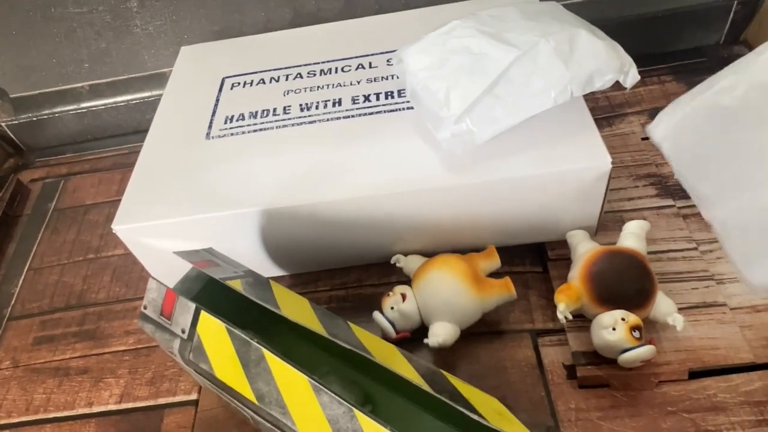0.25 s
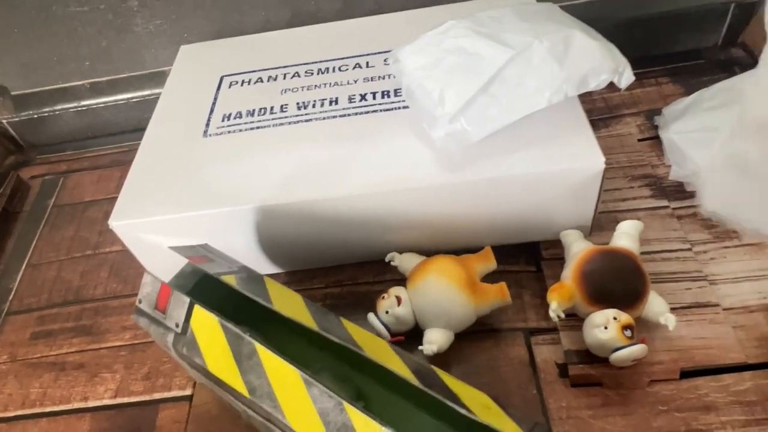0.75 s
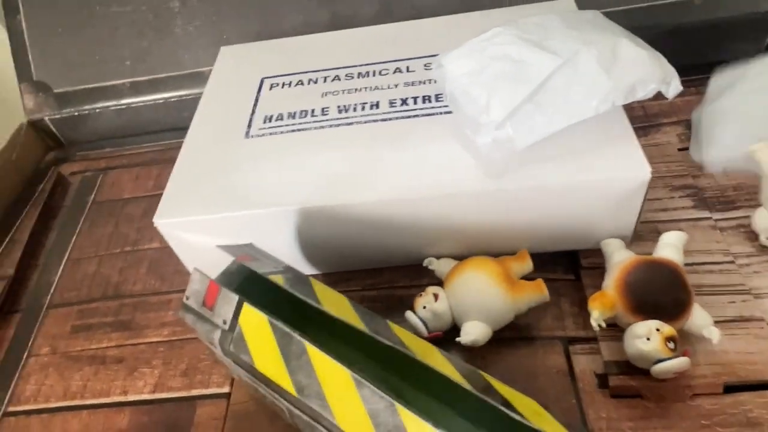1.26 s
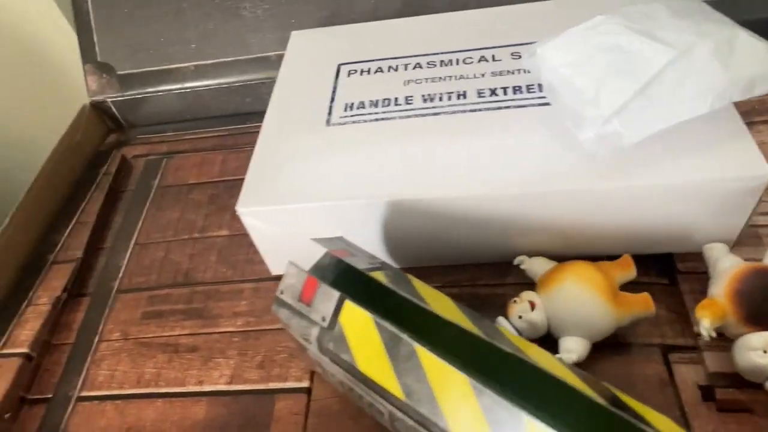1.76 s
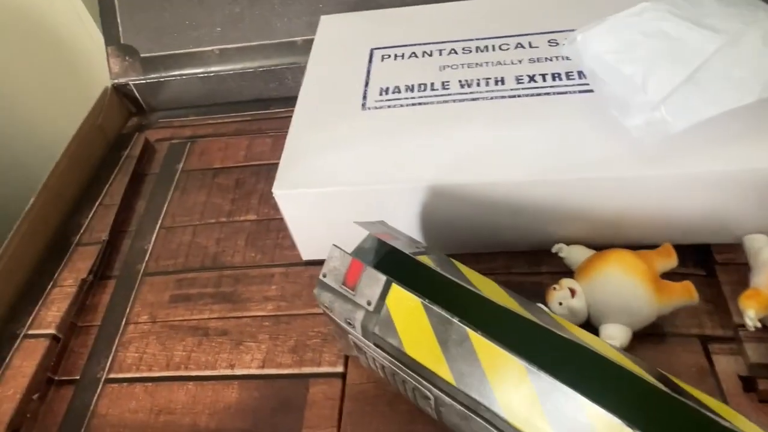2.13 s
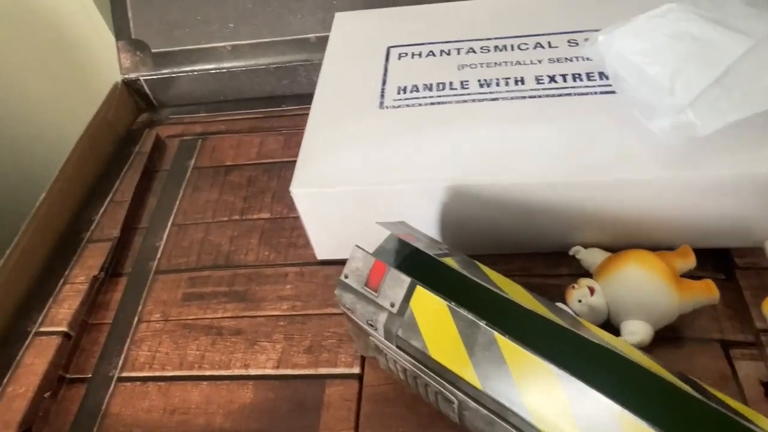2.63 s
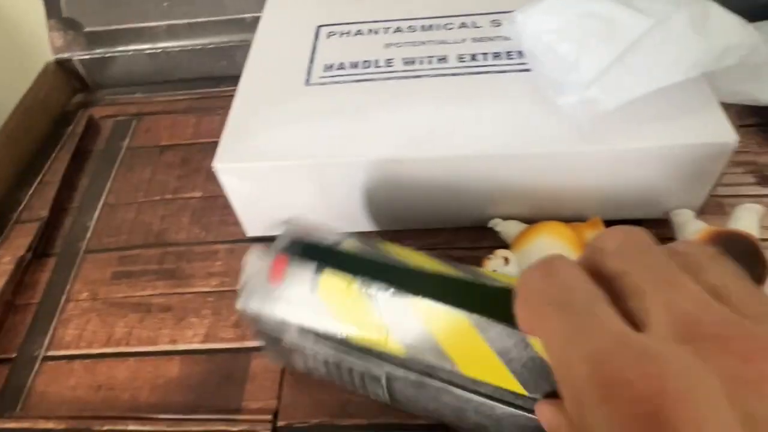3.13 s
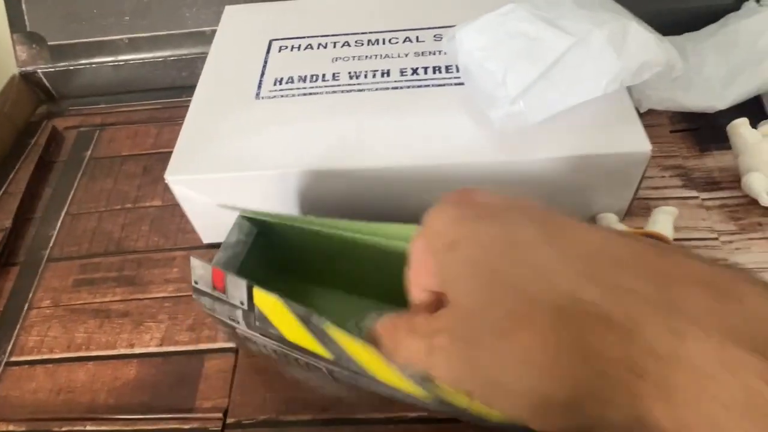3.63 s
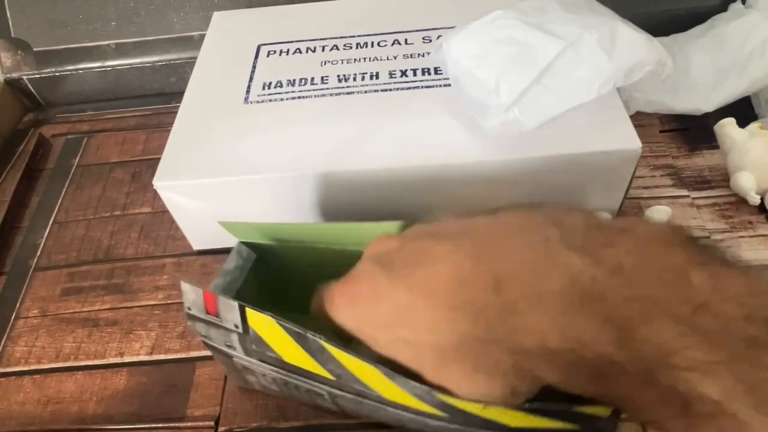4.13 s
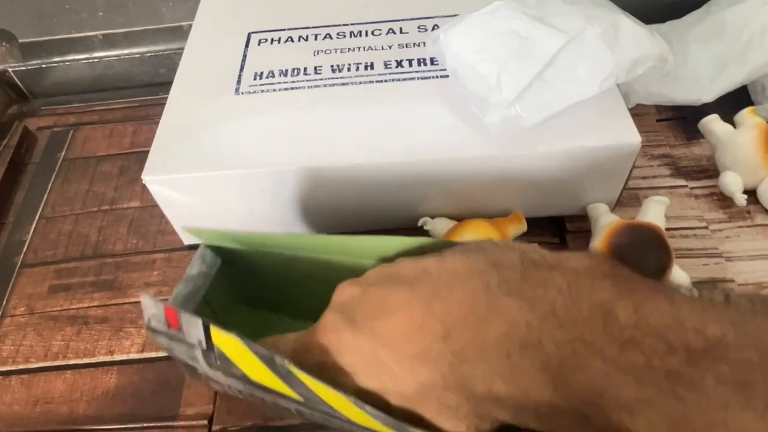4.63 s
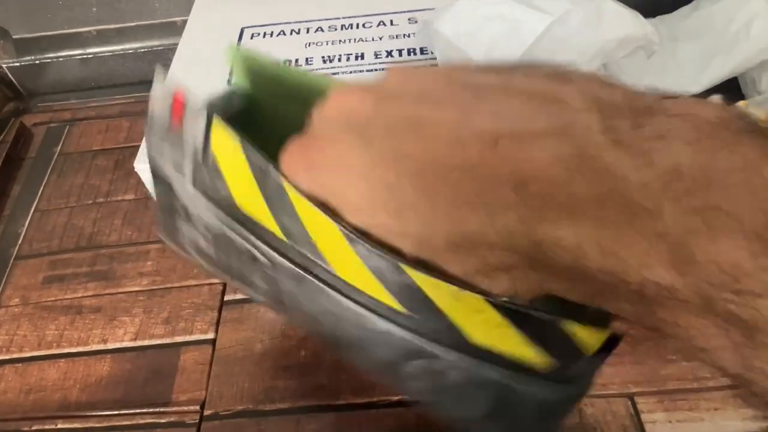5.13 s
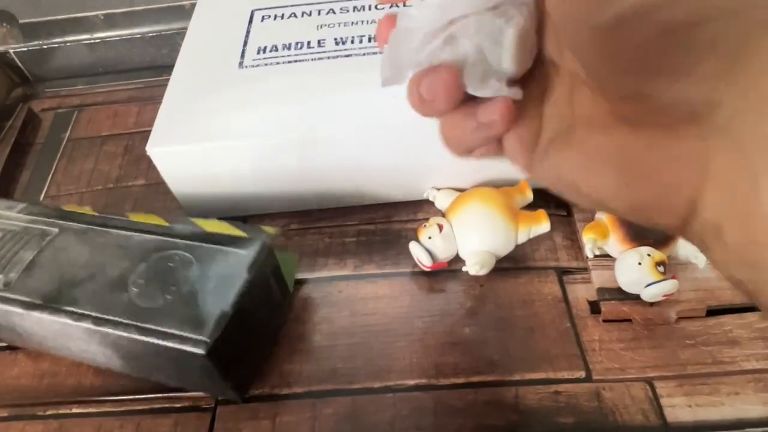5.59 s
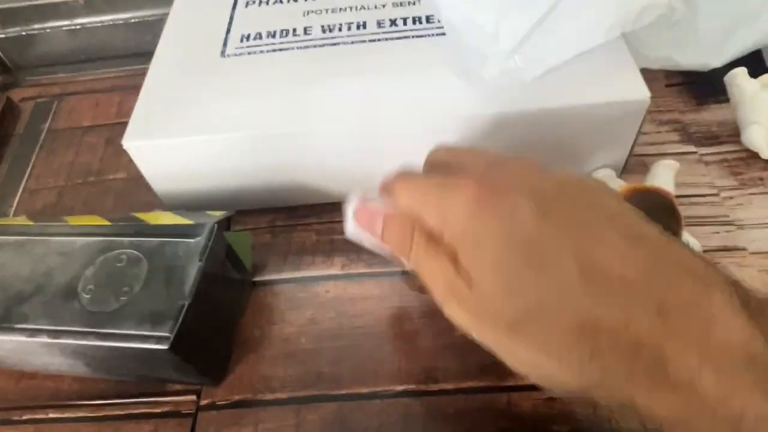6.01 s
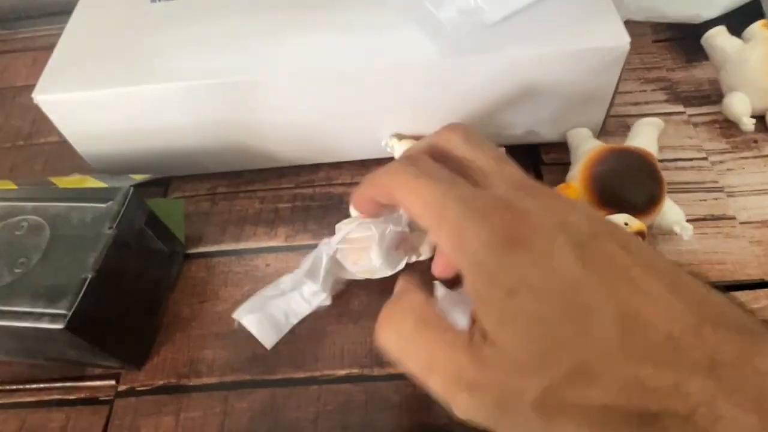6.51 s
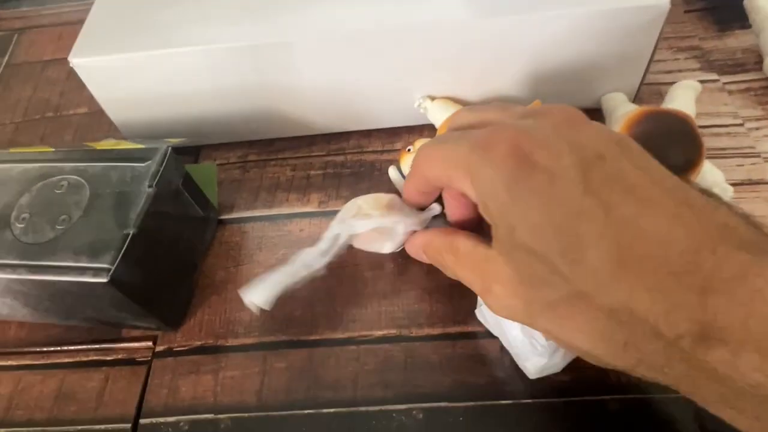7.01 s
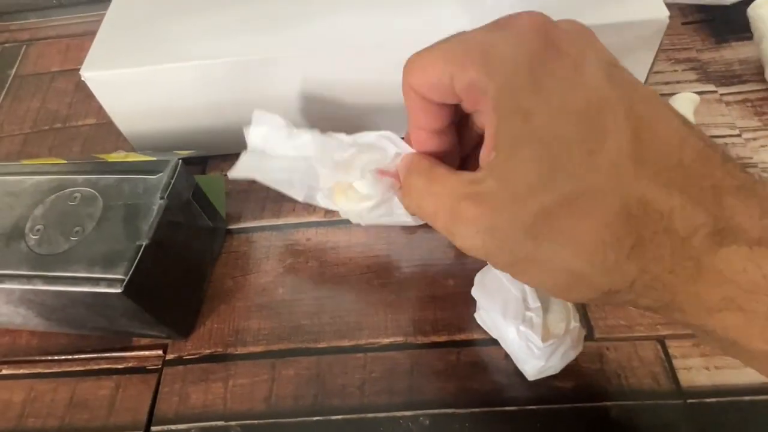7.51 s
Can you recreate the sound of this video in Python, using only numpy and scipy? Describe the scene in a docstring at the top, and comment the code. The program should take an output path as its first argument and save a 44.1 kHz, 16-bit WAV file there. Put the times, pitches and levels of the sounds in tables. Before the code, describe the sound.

A hand handles thin crackly paper right by the microphone, drops a little plastic figure with a firm knock, pauses, then rummages in a light card box with dull thuds, scrapes and boxy crinkling. The box thumps down, small clacks follow, and paper is picked open with fine snaps that grow bright at the end. Small room, short reverberation, soft hiss, hum and low camera handling rumble.

```python
"""Tissue paper crackles and snaps close by as a hand unwraps small plastic figures in a small room.
Swarms of damped sines over shaped hiss make the buckling paper; clicks with short rings make its snaps.
Figures drop on a card-covered table and fingers bump a thin carton: decaying modes with a thud and a rattle.
Fingers rub the carton (noise through its resonances), and the hand-held camera adds a slow handling rumble
over a quiet hiss and hum. Decaying noise gives the room's reverberation."""
import sys
import numpy as np
from scipy import signal
from scipy.fft import rfft, irfft, next_fast_len
from scipy.io import wavfile
from scipy.ndimage import uniform_filter1d, map_coordinates

SR = 44100
rng = np.random.default_rng(int(sys.argv[2]) if len(sys.argv) > 2 else 0)


def transcribe(u):
    """Save the signal u as a 16-bit wav file named by the first command-line argument.

    u: samples, shape (n,) or (channels, n), limited to [-1, 1]; the rate is SR.
    q: integer samples, one column per channel.
    """
    v = np.clip(np.atleast_2d(u).T, -1, 1)
    q = np.round(v * 32767).astype(np.int16)
    wavfile.write(sys.argv[1], SR, q)


N = 341775

# resonances of the thin cardboard carton: (frequency [Hz], level [dB], t60 for a blow of 0.2 s life [s])
CARTON_MODES = [(251.2, -2.5, 0.097), (312.3, 0, 0.075), (470, -5.5, 0.12), (622, -0.5, 0.11),
                (712, 7.5, 0.048), (799, -7.5, 0.19), (1094, 1.5, 0.043), (1410, -8, 0.06)]


def amp(db):
    """Amplitude ratio of a level in dB."""
    return 10 ** (np.asarray(db) / 20)


def unit(x):
    """Normalises to unit rms, so that a later gain sets the level."""
    return x / np.sqrt(np.mean(x ** 2) + 1e-20)


def along(points, hz):
    """Interpolates (frequency [Hz], value) points on a logarithmic frequency axis."""
    f, v = np.transpose(points)
    return np.interp(np.log(hz + 1), np.log(f + 1), v)


def curves(rows):
    """Interpolates each column after the time linearly, one value per sample."""
    s, *cols = np.transpose(rows)
    return [np.interp(np.arange(N) / SR, s, c) for c in cols]


def wobble(rate):
    """Smooth random modulation: a spline through Gaussian knots, rate knots a second."""
    knots = rng.standard_normal(int(N * rate / SR) + 4)
    return map_coordinates(knots, [np.arange(N) * rate / SR])


def filtered(x, response):
    """Linear filtering: the spectrum is multiplied by a response of frequency."""
    m = next_fast_len(N + 8192)
    return irfft(rfft(x, m) * response(np.fft.rfftfreq(m, 1 / SR)), m)[..., :N]


def coloured(x, spectrum):
    """Spectral shaping by a table of levels in dB, at unit rms."""
    return unit(filtered(x, lambda hz: amp(along(spectrum, hz))))


def swelling(base_db, peak_s, peak_db, rise_s, fall_s):
    """Incoherent addition: the powers of swells add to that of a base level; the result is in dB."""
    roundness = 0.89  # 1 = pointed swells, 2 = bell-shaped
    swell_db = 20  # drop below the peak one rise before it and one fall after it
    t = np.arange(0, N / SR + .002, .002)[None]
    late = t - peak_s[:, None]
    before = -late / np.abs(rise_s)[:, None]
    after = late / np.abs(fall_s)[:, None]
    away = np.where(late < 0, before, after)
    swells = np.sum(amp(peak_db[:, None] - swell_db * away ** roundness) ** 2, axis=0)
    return 10 * np.log10(amp(base_db) ** 2 + np.interp(np.arange(N) / SR, t[0], swells))


def quiet():
    """Stationary background noise: shaped room air and microphone hiss, with a slightly unsteady hum."""
    # spectrum of the background: (frequency [Hz], relative level [dB per Hz])
    air_colour = [(24, -34), (40, 3), (79, -3.5), (109, -47), (155, -5.5), (467, -28), (542, -53),
                  (852, -44), (1550, -42), (11000, -61), (13300, -67), (14300, -97)]
    hiss_db, hum_hz, hum_db = -54, 58, -55
    hum_phase = 2 * np.pi * np.cumsum(hum_hz + 1.61 * wobble(1.6)) / SR
    hum = amp(hum_db + 0.72 * wobble(2.6)) * np.sin(hum_phase)
    return amp(hiss_db) * coloured(rng.standard_normal(N), air_colour) + hum


def room(x):
    """Reverberation: convolution with noise in which each frequency decays at its own rate."""
    # decay of the room: (frequency [Hz], t60 [s])
    decay_times = [(200, 0.3), (1500, 0.2), (5000, 0.15), (15000, 0.051)]
    hz, t, z = signal.stft(rng.standard_normal(SR // 2), SR, nperseg=256)
    decay = amp(-60 * t / along(decay_times, hz)[:, None])
    tail = signal.istft(z * decay, SR, nperseg=256)[1]
    delayed = np.pad(x, (200, 0))  # samples before the reverberation begins
    return signal.fftconvolve(delayed, tail / np.linalg.norm(tail))[:N]


def hand():
    """Friction and handling noise: uneven slips wake the carton's modes; the grip rumbles and sways."""
    # hands at rest: (time [s], rub on carton and table [dB], handling rumble [dB])
    at_rest = [(0, -68, -45), (.4, -52, -75), (.7, -59, -58), (1.5, -61, -45), (1.96, -59, -47.5),
               (2.3, -54.5, -56), (2.55, -55, -64), (2.87, -64.5, -48.5), (3.3, -55, -37),
               (3.9, -48.5, -36), (4.15, -56, -60.5), (4.6, -71, -45), (5.1, -52, -69), (5.6, -56, -41),
               (6.1, -55, -47), (6.6, -57.5, -52), (7.0, -56, -67), (7.3, -65, -38.5), (7.75, -81, -80)]
    # moves of the hands: (peak time [s], rub [dB], rumble [dB], rise [s], fall [s])
    moves = [(.42, -52, -57.5, 0.53, 0.26), (0.912, -41, -31.5, 0.25, 0.47), (1.12, -50.5, -38.5, 1, 0.1),
             (1.29, -39, -35, 0.12, 0.38), (2.115, -51.5, -55, 0.038, 0.55), (3.06, -57, -37, 0.24, 0.24),
             (3.18, -41, -36, 0.18, 0.083), (3.28, -56, -29, 0.28, 0.36), (3.58, -43.5, -51, 0.26, 0.64),
             (3.75, -35, -37, 0.72, 0.16), (3.99, -33.5, -33.5, 0.33, 0.067),
             (4.42, -46, -43.5, 0.13, 0.082), (4.51, -39, -35, 0.085, .11), (4.73, -36, -31, 0.073, 0.067),
             (4.94, -51.5, -39, 0.27, 0.07), (5.05, -46, -59, 0.047, 0.123), (5.28, -37, -24, 0.051, 0.077),
             (5.37, -40, -42, 0.017, 0.19), (5.44, -36.5, -47, 0.1, 0.25), (5.57, -37, -35, 0.26, 0.21),
             (5.91, -49.5, -43, 0.49, 0.1), (6.5, -47, -43, 0.034, 0.48), (7.06, -62, -38.5, 0.1, 0.46),
             (7.549, -56, -41, 1, 0.058)]
    # spectra of rubbing, rumble and sway: (frequency [Hz], relative level [dB per Hz])
    rub_colour = [(59, -48), (100, 1.5), (227, -2.5), (310, 0), (395, -2), (517, -3), (987, -16.5),
                  (2500, -41), (3250, -50), (5500, -120)]
    rumble_colour = [(16, -10.5), (27, 5.5), (45, -0.5), (80, -9.5), (120, -13.5), (200, -51)]
    sway_colour = [(2, -8), (6, 9), (14, 10), (24, -56), (40, -78)]
    sway_mean_db = -39

    idle_db, still_db = curves(at_rest)
    s, drag_db, jolt_db, rise, fall = np.transpose(moves)
    rub_db = swelling(idle_db, s, drag_db, rise, fall)
    rumble_db = swelling(still_db, s, jolt_db, rise, fall)

    unevenness_db = np.clip(0.51 * (rub_db + 57), 1, 6)  # stronger rubbing slips less evenly
    slips = coloured(amp(unevenness_db * wobble(40)) * rng.standard_normal(N), rub_colour)

    def body(f):
        """Resonance: the direct sound plus a 35 Hz wide band-pass at each carton mode."""
        return 1 + sum(0.42 * 1j * f * 35 / (c * c - f * f + 1j * f * 35) for c, _, _ in CARTON_MODES)

    rub = unit(filtered(slips, body))
    rumble = coloured(rng.standard_normal(N), rumble_colour)
    # even out chance swells so that the strength follows the grip closely
    rumble = rumble / np.sqrt(0.53 + np.abs(uniform_filter1d(rumble ** 2, size=3000)))
    sway_db = sway_mean_db + 0.19 * (rumble_db - rumble_db.mean())
    sway = coloured(rng.standard_normal(N), sway_colour) * amp(sway_db)
    return amp(rub_db) * rub, amp(rumble_db) * rumble + sway


def knocks(blows, modes, ring_db, thud_db, rattle_db):
    """Modal excitation: a blow rings mostly the modes near its pitch, with a thud and a settling rattle."""
    out, t = np.zeros(N + SR), np.arange(SR // 2) / SR
    hz, level, t60 = np.transpose(modes)[:, :, None]
    soft = signal.butter(2, [130, 800], "band", fs=SR, output="sos")
    for s, db, pitch_hz, life in blows:
        octaves = np.log2(hz / pitch_hz)
        near = -3 * np.abs(octaves) + 6 * np.exp(-(octaves / 0.14) ** 2)  # the spot hit favours one mode
        strength = amp(level + near + rng.normal(0, 2.5, hz.shape))
        # lossy card blurs the higher modes more
        flutter = np.cumsum(rng.normal(0, 0.044, (len(hz), len(t))), axis=1) * hz / 600
        held = t60 * life / 0.2  # a blow damped by the hand shortens all modes alike
        partials = strength * amp(-60 * t / held) * np.sin(2 * np.pi * hz * t + flutter)
        ring = partials.sum(0)
        thud = np.sin(2 * np.pi * pitch_hz * t) * amp(-60 * t * pitch_hz / 3.6)  # gone in a few cycles
        rattle = unit(signal.sosfilt(soft, rng.standard_normal(len(t)))) * amp(-60 * t / (0.6 * life))
        blow = amp(ring_db) * ring + amp(thud_db) * thud + amp(rattle_db) * rattle
        # gentler blows touch for longer, bright ones briefly [s]
        contact = min(0.00051 * amp(-.5 * db), .8 / pitch_hz)
        out[round(s * SR):][:len(t)] += amp(db) * blow * (1 - np.exp(-t / contact))
    return out[:N]


def carton_bumps():
    """Damped modal response of thin card to fingers that bump the carton."""
    # bumps: (time [s], strength [dB], pitch of the thud [Hz], life that scales the decays [s])
    bumps = [(3.0165, -25.5, 284, 0.1), (3.1106, -23.5, 1410, 0.046), (3.118, -33, 770, 0.1),
             (3.2294, -26, 820, 0.086), (3.2677, -20.5, 344, 0.12), (3.436, -27, 1430, 0.032),
             (3.4703, -25.5, 226, 0.092), (3.549, -39, 280, 0.025), (3.5933, -36, 318, 0.36),
             (3.6544, -25.5, 1100, 0.078), (3.6945, -26.5, 300, 0.14), (3.707, -20, 1470, 0.052),
             (3.7235, -20.5, 305, 0.031), (3.7524, -21, 466, 0.051), (3.811, -27, 870, 0.087),
             (3.8415, -18, 530, 0.11), (3.9133, -23.5, 310, 0.12), (3.959, -18, 252, 0.19),
             (4.1337, -27.5, 250, 0.03), (4.3315, -22, 620, 0.064), (4.3351, -20.5, 251, 0.17),
             (4.383, -20, 500, 0.052), (4.3926, -23.5, 247, 0.25), (4.429, -19.5, 248, 0.2),
             (4.519, -29.5, 246, 0.29), (4.6857, -21.5, 332, 0.092), (4.7459, -34, 335, 0.12),
             (5.0583, -23, 315, 0.12), (5.2235, -28, 1100, 0.059), (5.2359, -16.5, 424, 0.11),
             (5.2636, -12, 162, 0.046), (5.279, -26, 320, .1), (5.293, -32, 595, .08),
             (5.307, -28, 324, .08)]
    return knocks(bumps, CARTON_MODES, ring_db=-7.0, thud_db=1, rattle_db=-11.5)


def table_drops():
    """Damped modal response of the card-covered table to figures and fingers that land on it."""
    # landings: (time [s], strength [dB], pitch of the thud [Hz], life that scales the decays [s])
    drops = [(0.8914, -4, 397, 0.07), (0.909, -16.5, 614, 0.31), (0.9185, -15.5, 237, 0.34),
             (0.9295, -24, 970, 0.18), (1.2252, -20, 314, 0.15), (1.2345, -14.5, 1015, 0.066),
             (1.2795, -14.5, 440, 0.058), (1.2945, -18.5, 300, 0.1), (1.575, -31.5, 733, 0.048),
             (1.7573, -32.5, 717, 0.066), (1.812, -40, 703, .05), (2.7118, -36.5, 257, 0.069),
             (2.7962, -35, 182, 0.22), (5.369, -16, 685, 0.029), (5.3761, -16, 282, 0.18),
             (5.4345, -4.5, 390, 0.11), (5.4549, -16, 343, 0.15), (5.5354, -25, 564, 0.044),
             (5.5385, -10, 530, 0.086), (5.6239, -20.5, 650, 0.09), (5.6651, -23.5, 226, 0.15),
             (5.738, -19.5, 444, 0.08), (6.2331, -32.5, 143, 0.17), (6.2877, -33, 287, 0.069),
             (6.3224, -26, 342, 0.043), (6.4352, -31.5, 327, 0.081), (6.5032, -9.5, 567, 0.071),
             (6.5288, -24, 304, 0.11), (6.5767, -19, 394, 0.072), (6.6701, -26, 325, 0.035),
             (6.7008, -24, 280, 0.12), (6.7481, -21.5, 325, 0.049), (6.7884, -27, 333, 0.052),
             (6.9729, -32.5, 270, 0.089), (7.0714, -27.5, 266, 0.013), (7.1378, -29, 250, 0.017)]
    # resonances of the table: (frequency [Hz], level [dB], t60 for a blow of 0.2 s life [s])
    table_modes = [(177.8, -3.5, 0.29), (225, -5.5, 0.15), (269, -2.5, 0.14), (343, -2, 0.17),
                   (517.6, -2, 0.094), (654.6, 3, 0.14), (797, -8.5, 0.14), (1075, 1, 0.075),
                   (1360, -15, 0.06), (2380, -2.5, 0.025)]
    return knocks(drops, table_modes, ring_db=-11.5, thud_db=6.5, rattle_db=-11)


def flurries():
    """Impulsive release: folds give way all at once; part of the crackle resonates in the fold's pocket."""
    # sudden folds: (time [s], level [dB], pitch [Hz], t60 [s], ringing share of the power [0-1])
    folds = [(0.25, -32.5, 3680, 0.68, 0.65), (.541, -28.5, 3750, 0.21, 0.37),
             (0.741, -16.5, 3980, 0.33, 0.29), (1.344, -32, 2940, 0.095, 0.3), (2.094, -43, 3040, .2, 0.14),
             (2.115, -33, 1980, 0.2, 0.1), (4.505, -27, 3280, 0.045, 1), (4.821, -40, 3300, 0.061, 0.7),
             (4.935, -33.5, 3160, 0.16, 0.86), (5.023, -32.5, 2850, 0.1, 0.97), (5.223, -39, 2280, 0.46, 1),
             (5.25, -39, 1920, .2, .8), (5.3, -34, 1940, 0.093, 0.9), (6.836, -26, 3000, 0.058, 0.06),
             (7.305, -35, 3920, 0.18, 0.6), (7.609, -32, 4380, 0.039, 0)]
    out, t = np.zeros(N + SR), np.arange(SR // 3) / SR
    for s, db, hz, t60, share in folds:
        share = np.clip(share, 0, 1)
        noise = rng.standard_normal(len(t))
        unevenness = uniform_filter1d(rng.standard_normal(len(t)), size=60) * 60 ** .5
        grit = noise * amp(0.94 * unevenness)
        pocket = unit(signal.lfilter(*signal.iirpeak(hz, 7, SR), grit))
        crackle = share ** .5 * pocket + (1 - share) ** .5 * unit(np.diff(grit, prepend=0))
        out[round(s * SR):][:len(t)] += amp(db - 60 * t / t60) * crackle * (1 - np.exp(-t / 0.0034))
    return out[:N]


def snaps(cycles=32):
    """Transient buckling: a broad click, a ring down 60 dB in the given cycles and a puff of finer crackle."""
    # single creases that snap: (time [s], strength [dB], pitch [Hz])
    snapping = [(0.0095, -24, 12200), (0.0269, -23.5, 3860), (0.102, -35.5, 1240), (0.125, -26, 3750),
                (0.176, -33.5, 11400), (0.202, -25.5, 3740), (0.2565, -17.5, 3250), (0.3243, -21.5, 3280),
                (0.3322, -21, 3900.0), (0.3543, -28, 6360), (0.5174, -25, 4600), (0.546, -20, 4670),
                (0.679, -24, 3260), (0.951, -27, 2280), (1.014, -38, 2180), (1.1085, -35, 6750),
                (1.158, -41, 2640), (1.188, -38, 5330), (1.1938, -37, 4130), (1.4088, -25.5, 4200),
                (1.506, -48, 2500), (1.546, -54.5, 2900), (1.577, -40, 2910), (1.6874, -43, 9400),
                (1.738, -52, 2680), (2.32, -30.5, 11000), (2.3434, -36, 3376), (2.4063, -26, 10300),
                (2.4946, -27, 3220), (2.5977, -33.5, 2700), (2.619, -36, 3650), (2.7015, -35, 11700),
                (2.7258, -32, 3370), (3.0655, -38, 2800), (3.23, -37, 2400), (3.658, -34, 2410),
                (3.7025, -30, 11700.0), (3.894, -30, 13100.0), (3.909, -35, 3550), (3.9637, -34, 3640),
                (4.0016, -28, 3670), (4.0084, -29, 3630), (4.0248, -19, 10700), (4.2233, -37, 2430),
                (4.2866, -30.5, 3560), (4.3879, -35, 3730), (4.43, -33, 3000.0), (4.452, -29, 2600),
                (4.47, -33, 2460), (4.6814, -33.5, 2200), (4.5104, -27, 3370), (4.515, -24, 3470),
                (4.539, -21, 3980), (4.7005, -26, 6350), (4.7403, -30, 3420), (4.7618, -28, 2340),
                (4.778, -28, 2330), (4.84, -20.5, 2840), (4.917, -31, 4000), (4.9359, -26, 3240),
                (4.9446, -30, 3150), (5.059, -23, 2330), (5.0866, -24, 2400), (5.1308, -35, 3200),
                (5.1942, -37, 2400), (5.2331, -29, 2350), (5.2345, -28.5, 4870), (5.3269, -30, 3300),
                (5.3564, -31, 3230), (5.3687, -20, 12700.0), (5.434, -21, 2010), (5.504, -30.5, 3740),
                (5.54, -31, 2180), (5.585, -35, 3780), (5.621, -33, 2840), (5.631, -28, 3600),
                (5.672, -20, 8100), (5.716, -29, 8900.0), (5.738, -16.5, 3660), (5.7796, -23.5, 3830),
                (5.829, -26.5, 3540), (5.8621, -33, 2160), (5.8807, -27, 3870), (5.9258, -35, 1350),
                (6.017, -34.5, 3250), (6.0563, -27.5, 4260), (6.117, -30, 4300), (6.1523, -28, 4070),
                (6.3278, -33, 12050), (6.3502, -34, 8400), (6.4744, -30, 4330), (6.4822, -26, 8300),
                (6.5594, -35, 2960), (6.7066, -25, 9000), (6.738, -29, 2680), (6.761, -32, 2600),
                (6.777, -34, 2560), (6.855, -27, 10850), (6.867, -33, 2840), (6.9439, -33, 5170),
                (6.953, -31, 8700), (6.991, -31, 5540), (7.0359, -22, 12600.0), (7.054, -27, 6950),
                (7.0668, -29, 4800), (7.1046, -29.5, 5100), (7.1187, -33, 2640), (7.1748, -28.5, 12200),
                (7.1937, -32, 12500.0), (7.235, -28, 13000), (7.2443, -34, 4450), (7.2632, -25, 12400),
                (7.3087, -23, 3640), (7.317, -19, 12500), (7.3219, -19, 9600), (7.3435, -27, 3590),
                (7.363, -21, 4700.0), (7.3934, -22, 4480), (7.408, -26, 4720), (7.4128, -17, 6770),
                (7.426, -15.5, 4430), (7.438, -18, 7460), (7.442, -23, 5860), (7.448, -27, 4770),
                (7.4805, -24, 6940), (7.4968, -22, 7050), (7.5103, -29, 2620), (7.612, -25, 4930),
                (7.6527, -32, 2700.0), (7.6704, -24, 3400), (7.684, -27, 4900), (7.7232, -27, 9000.0)]
    out, t = np.zeros(N + SR), np.arange(SR // 25) / SR
    for s, db, hz in snapping:
        dulling = signal.butter(N=1, Wn=min(5.4 * hz, .45 * SR), fs=SR)  # broad folds click duller
        noise = signal.lfilter(*dulling, np.diff(rng.standard_normal(len(t) + 1)))
        click = noise * (0.3 * amp(-60 * t / 0.0079) + 0.089 * amp(-60 * t / 0.035))  # click and puff
        flutter = np.cumsum(rng.normal(0, 0.26, len(t)))
        ring = np.sin(2 * np.pi * hz * t + flutter) * amp(-60 * t * hz / cycles)
        out[round(s * SR):][:len(t)] += amp(db) * (click + ring) * (1 - np.exp(-t / .0001))
    return out[:N]


def pings(start, hz, cycles, gain, size):
    """Damped oscillation: sines that decay by 1/e in the given cycles, summed at their start samples."""
    k = np.arange(size)
    turn = np.minimum(hz, SR / 2.2)[:, None] * k / SR
    decay = np.exp(-turn / max(cycles, .2))
    wave = gain[:, None] * np.sin(2 * np.pi * turn + 1) * decay
    return np.bincount((start[:, None] + k).ravel(), wave.ravel(), N + size)[:N]


def creases(count, spread_db, most_db, cycles):
    """Random superposition of buckling creases, most of them tiny, some larger."""
    when, pitch, luck = rng.random((count, 3)).T
    hz = 1200 * 13 ** pitch
    size_db = np.minimum(-spread_db * np.log(1 - luck), most_db)
    gain = amp(size_db) * hz / 5000
    return pings((when * N).astype(int), hz, cycles, gain, size=128)


def runs(per_s, fade_s):
    """Avalanche: one crease sets off a run of others that starts at once and fades; values 0-1."""
    trigger = (rng.random(N) < per_s / SR) * rng.random(N)
    return np.minimum(signal.lfilter([1], [1, -np.exp(-1 / (fade_s * SR))], trigger), 1)


def patchy(x, depth_db):
    """Time-varying colour from fold to fold: random gain in patches of about 800 Hz by 25 ms."""
    z = signal.stft(x, nperseg=256)[2]
    across_hz = uniform_filter1d(rng.standard_normal(z.shape), size=5, axis=0)
    field = uniform_filter1d(across_hz, size=8, axis=1)
    return unit(signal.istft(z * amp(depth_db * unit(field)), nperseg=256)[1][:N])


def paper():
    """Buckling and friction: creases over sliding hiss; broad, middle and fine folds have their own bands."""
    # paper lying uneasily: (time [s], middle folds [dB], fine folds over it [dB], broad folds over it [dB])
    rustle = [(0, -50.5, -15, -3), (.5, -46, -4, -12), (.9, -58, -15, -4), (1.1, -65, -21, -12),
              (1.5, -63, -9, -1), (1.96, -90, -18.5, 17), (2.09, -74.5, -17, 11.5), (2.46, -64, -14, 2.5),
              (2.87, -69, -7.5, 5), (3.2, -59, -0.5, 4.5), (3.6, -60, -4, 5.5), (3.9, -66, -5.5, 2),
              (4.15, -68, -4, 5), (4.45, -52, -4, 5), (5.1, -70, -11, -21), (5.5, -59.5, -20.5, -5),
              (6.0, -73, -8, -17), (6.3, -58.5, 0, -20), (6.6, -63, -13, -12), (7.0, -54.5, -4, -8),
              (7.75, -73, -4, -19)]
    # the hand squeezes or pulls: (peak time [s], middle folds [dB], rise [s], fall [s],
    # fine folds over it [dB], broad folds over it [dB])
    squeezes = [(0, -42, 0.11, 0.34, 2, -7.5), (.27, -42, 0.13, 0.39, 6, -5),
                (0.407, -30, 0.15, .03, 1, -7), (.56, -38, 0.087, 0.067, 1, -6),
                (0.686, -31, 0.047, 0.015, -1.5, -14.5), (0.774, -26, 0.059, 0.093, 4, -5.5),
                (0.947, -45, 0.05, 0.11, -5, 7), (1.105, -54, 0.032, 0.041, 0, -19.5),
                (1.19, -44.5, 0.0092, 0.026, -4, -8), (1.295, -39, 0.061, 0.051, -1, -0.5),
                (1.368, -41.5, 0.04, 0.13, 4.5, 1.5), (1.57, -56, 0.012, 0.064, -49, 2),
                (2.112, -41, 0.013, 0.44, 0.5, -3.5), (2.19, -39, 0.033, 0.097, 4, -0.5),
                (2.245, -36.5, 0.098, 0.029, 0, -1.5), (2.407, -42.5, 0.018, 0.013, -11, -13),
                (2.61, -49.5, 0.13, 0.059, -1.5, -3), (2.73, -53.5, 0.21, 0.12, -2, -3),
                (2.508, -61, 0.023, 0.081, 9, -12), (3.114, -50, 0.012, 0.062, -27, 11),
                (3.28, -53, 0.12, 0.027, -12, 4), (3.71, -49, 0.22, 0.39, -7.5, 6),
                (3.97, -48.5, 0.27, 0.3, -1.5, 0), (4.18, -52.5, 0.028, 0.31, 0, -15),
                (4.31, -49.5, 0.24, 0.04, -1, -21), (4.46, -44.5, 0.033, 0.26, 3, -4),
                (4.55, -41, 0.11, 0.21, 4, -9), (4.68, -48, 0.018, 0.53, -20, -7),
                (4.829, -44, 0.33, 0.21, -2, -3), (5.03, -43.5, 0.12, 0.35, -2, -15),
                (5.14, -47, 0.57, 0.034, 3.5, 2), (5.249, -37.5, 0.081, 0.053, -1, 3.5),
                (5.31, -46.5, 0.071, 0.39, -0.5, 0), (5.44, -47, 0.12, 0.046, -29, -11),
                (5.55, -48.5, 0.19, 0.068, -4, 13), (5.68, -48, 0.25, 0.057, -5, -28),
                (5.75, -51.5, 0.095, 0.13, -4, -3), (5.81, -43.5, 0.12, 0.26, 2.5, -5.5),
                (6.22, -49.5, 0.27, 0.084, 2, 3.5), (6.46, -53.5, 0.19, 0.85, 4, 2.5),
                (6.69, -50.5, 0.048, 0.26, 8, 2), (6.78, -48, 0.11, 0.051, -2, -13),
                (6.859, -39, 0.029, 0.08, 0, -6.5), (7.12, -51.5, 0.13, 0.37, -2, -8),
                (7.25, -50.5, 0.069, 0.056, -3, -3), (7.318, -38.5, 0.015, 0.12, 3, -8),
                (7.453, -35.5, 0.093, 0.091, 2.5, -8.5), (7.616, -39, 0.012, 0.022, 0.5, -5.5),
                (7.66, -48.5, 0.11, 0.42, 2.5, -9.5), (7.75, -36.5, 0.02, .1, 1, -10)]
    # spectrum of the crackle: (frequency [Hz], relative level [dB per Hz])
    paper_colour = [(300, 4), (1000, 9.5), (1700, -2.5), (2500, -3), (3800, -3), (5200, -8), (7000, -10.5),
                    (9000, -11.5), (12000, -10.5), (14500, -16.5), (16000, -14)]
    # air in the carton colours paper crushed inside it: (frequency [Hz], width [Hz], level [dB])
    air_modes = [(2350, 300, -3), (3350, 350, -3)]
    enter_s, leave_s = 4.15, 5.3  # paper inside the carton

    calm_db, calm_fine, calm_broad = curves(rustle)
    s, db, rise, fall, over_fine, over_broad = np.transpose(squeezes)
    crackle_db = swelling(calm_db, s, db, rise, fall)
    fine_db = swelling(calm_db + calm_fine, s, db + over_fine, rise, fall)
    broad_db = swelling(calm_db + calm_broad, s, db + over_broad, rise, fall)

    swarm = unit(creases(count=30000, spread_db=1.0, most_db=10.5, cycles=3.1))
    hiss = amp(-0.5) * rng.standard_normal(N)
    bursts = amp(8.2 * runs(per_s=35, fade_s=0.024))
    sheet = coloured(bursts * (swarm + hiss), paper_colour)
    sheet = patchy(sheet, depth_db=2.0)
    # even out chance swells so that the strength follows the hand closely
    sheet = sheet / np.sqrt(0.34 + np.abs(uniform_filter1d(sheet ** 2, size=2600)))

    fine = filtered(sheet, lambda hz: 1 / (1 + (6000 / (hz + 1)) ** 6))
    broad = filtered(sheet, lambda hz: 1 / (1 + (hz / 2000) ** 6))
    middle = sheet - fine - broad

    def hollow(f):
        """Cavity resonance: the sum of a band-pass at each air mode."""
        return sum(amp(db) * 1j * f * w / (c * c - f * f + 1j * f * w) for c, w, db in air_modes)

    inside, = curves([(enter_s - .1, 0), (enter_s, 1), (leave_s, 1), (leave_s + 0.088, 0)])
    middle = middle + inside * filtered(middle, hollow)
    return amp(crackle_db) * unit(middle) + amp(fine_db) * unit(fine) + amp(broad_db) * unit(broad)


def scene():
    """Superposition: sources on the table sound in the room; rumble and hiss reach the microphone directly."""
    rub, rumble = hand()
    near = paper() + snaps() + flurries() + rub
    near = near + table_drops()
    near = near + carton_bumps()
    return (near + amp(-15.0) * room(near) + rumble + quiet())[None]


def record(dry):
    """Saturation and band limiting: loud peaks flatten and the camera keeps nothing above its top frequency."""
    clip = .5  # largest swing the recorder passes
    top_hz = 15900
    flat = dry / (1 + np.abs(dry / clip) ** 6) ** (1 / 6)
    return filtered(flat, lambda hz: np.clip((top_hz - hz) / 600, 0, 1))


dry = scene()
out = record(dry)
transcribe(out)
```